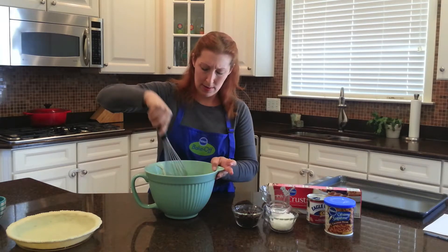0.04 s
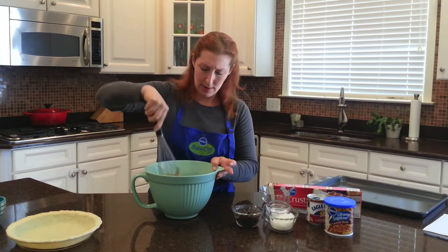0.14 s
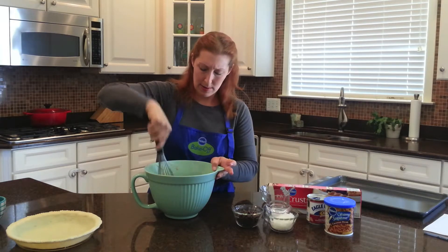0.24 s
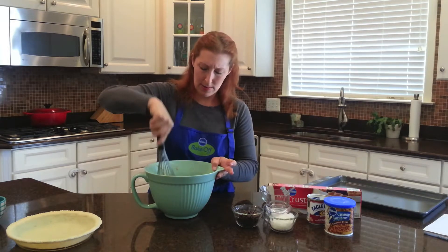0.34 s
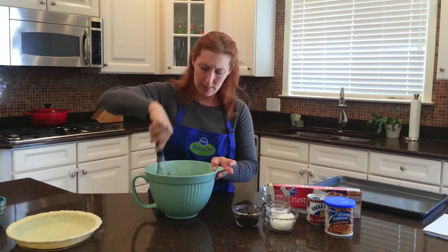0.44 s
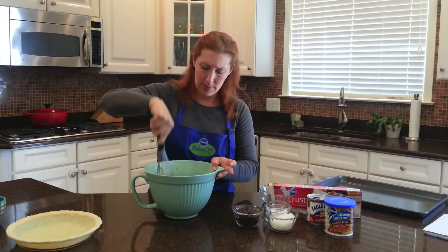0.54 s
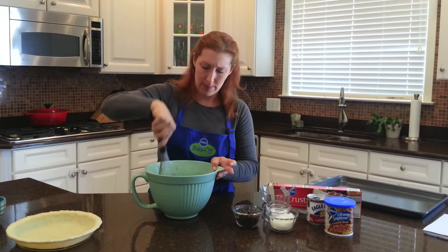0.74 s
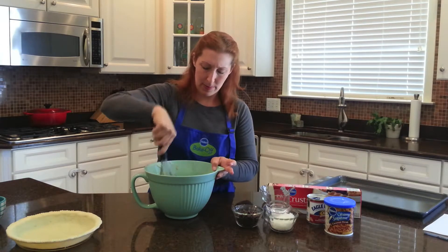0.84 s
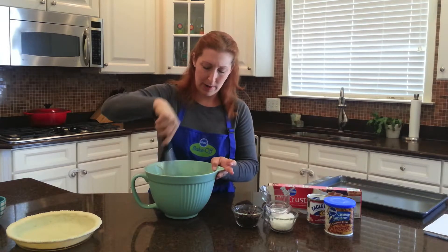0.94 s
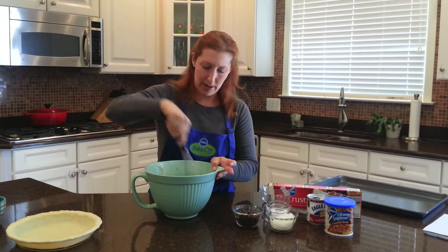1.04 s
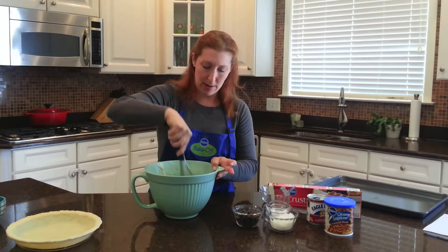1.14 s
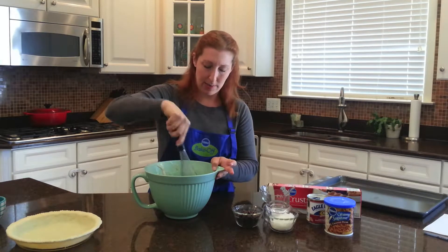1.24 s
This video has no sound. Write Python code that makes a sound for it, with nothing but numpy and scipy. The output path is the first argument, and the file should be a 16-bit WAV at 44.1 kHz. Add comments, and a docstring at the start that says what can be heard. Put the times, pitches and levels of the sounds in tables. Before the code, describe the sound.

A wire whisk strikes a ceramic bowl in a loud bright rattle, scrapes through thick filling, knocks the rim more dully, then rattles again; stereo microphone a couple of metres away in a hard, ringing kitchen.

```python
"""Quiet room tone and low hum, then a bright rattle: a whisk beats a thick filling in a ceramic bowl on stone.
The stereo microphone stands a couple of metres away in a hard kitchen, which rings after each rap.
Raps, rim knocks and foot bumps are short contacts exciting resonant modes; the dragging wires are random
slips over a diffuse hiss; drag treble, slop, counter rumble and room tone are coloured noise; the hum is a sine."""
import sys
import numpy as np
from scipy import signal
from scipy.fft import rfft, irfft, next_fast_len
from scipy.io import wavfile
from scipy.ndimage import map_coordinates

SR = 44100
rng = np.random.default_rng(int(sys.argv[2]) if len(sys.argv) > 2 else 0)


def digitize_waveform(pressure):
    """Quantize a signal to 16-bit integers and store it at the path in sys.argv[1].

    Rows of a 2-D input are taken as channels; values are limited to [-1, 1].
    """
    field = np.atleast_2d(pressure).T
    bounded = np.clip(field, -1, 1)
    quanta = np.round(bounded * 32767).astype(np.int16)
    wavfile.write(sys.argv[1], SR, quanta)


def voltage_ratio(decibels):
    """Convert decibels (scalar or array-like) to amplitude ratios, 20 dB per decade."""
    exponent = np.asarray(decibels, float) / 20
    return 10 ** exponent


N = 57330

# Quiet house noise. Each row: frequency in Hz, relative level in dB.
ROOM_TONE_COLOUR = [(59, -37), (100, -16.5), (183, -14.5), (221, -3.5), (283, -16.5), (518, -19.5),
                    (575, -30.5), (1050, -21), (1660, -26.5), (14500, -26.5)]
# Reverberation of the hard kitchen. Each row: frequency in Hz, time to fall 60 dB in seconds.
KITCHEN_T60 = [(200, 0.3), (700, 0.63), (2000, 0.4), (6000, 0.43), (13000, 0.24)]
# Left-right likeness of diffuse sound. Each row: frequency in Hz, likeness from 0 to 1.
ROOM_ALIKE = [(100, 0.7), (400, 0.7), (1000, .1), (5000, 0.02)]
# Shading of the microphone ports toward the bowl. Each row: frequency in Hz, left over right in dB.
PORT_LEAN = [(300, 0), (2000, 2.5), (5000, 8.5), (9000, -17), (14000, 2)]
# The counter shaking. Each row: time in seconds, level in dB before the layer's trim.
RUMBLE_LEVEL = [(0.0, -74), (0.158, -83), (0.246, -54.5), (0.604, -80.5), (0.648, -73), (0.854, -74),
                (0.882, -58), (0.93, -55.5), (1.012, -77), (1.07, -55), (1.122, -51), (1.146, -82),
                (1.198, -64.5), (1.3, -53)]
# Colour of the shaking counter. Each row: frequency in Hz, relative level in dB.
RUMBLE_COLOUR = [(15, -44), (35, -11), (58, -5), (100, -17), (150, -12), (300, -69.5)]
# The filling folding over. Each row: time in seconds, level in dB before trim and wobble.
SLOP_LEVEL = [(0.0, -72), (0.184, -73.5), (0.224, -53), (0.608, -70), (0.644, -63), (0.68, -69.5),
              (0.716, -58.5), (0.774, -68.5), (0.868, -64), (0.878, -62), (0.916, -50), (1.034, -67.5),
              (1.046, -50), (1.114, -43.5), (1.136, -44.5), (1.154, -42.5), (1.274, -59), (1.3, -54.5)]
# Colour of the folding filling. Each row: frequency in Hz, relative level in dB.
SLOP_COLOUR = [(71, -39.5), (120, -13.5), (161, -10.5), (217, 0.5), (333, -6.5), (436, 0), (571, -4),
               (900, -15.5), (1170, -34.5), (1980, -120)]
# Extra treble where the scrape turns brighter. Each row: time in seconds, level in dB before the wobble.
DRAG_TREBLE_LEVEL = [(.41, -89), (.44, -70), (.465, -55), (.49, -58), (.52, -79)]
# Colour of that extra treble. Each row: frequency in Hz, relative level in dB.
DRAG_TREBLE_COLOUR = [(4000, -41.5), (8000, -6), (11000, -1.5), (14000, -9), (16000, -32)]
# Wires scraping the wall through the filling. Each row: time in seconds, level in dB before the trims.
DRAG_LEVEL = [(.18, -74), (.198, -66.5), (.21, -47.5), (.3, -44.5), (.4, -58.5), (.44, -49), (.488, -58),
              (.526, -76), (.54, -62.5), (.602, -105), (.62, -66), (.635, -55.5), (.696, -76), (.73, -71),
              (.802, -93), (.808, -70.5), (.816, -51), (.858, -71.5), (.882, -55.5), (.93, -60.5),
              (1.03, -84), (1.048, -72.5), (1.06, -54.5), (1.1, -52), (1.27, -65), (1.3, -42.5)]
# Colour of the scraping wires. Each row: frequency in Hz, relative level in dB.
DRAG_COLOUR = [(410, -36), (700, -18.5), (1360, -9.5), (1950, -8), (3710, -9.5), (7130, 2.5), (9330, -8.5),
               (14100, -12), (15000, -36)]
# The bowl's foot bumping the counter. Each row: start in seconds, dry peak in dB, pitch in Hz.
FOOT_BUMPS = [(.706, -51, 265), (0.713, -58, 191), (0.734, -56, 256), (0.874, -53, 361), (1.045, -48, 318),
              (1.102, -49, 422), (1.114, -50, 201), (1.144, -48, 262), (1.15, -52, 457)]
# The one mode rung by a light touch. Each row: frequency in Hz, width in Hz, relative level in dB.
TING_MODE = [(2150, 24, 0)]
# The handle knocking the rim. Each row: start in seconds, dry peak in dB.
RIM_KNOCKS = [(0.8899, -24.5), (0.8943, -30.5), (0.914, -32.5)]
# Rim modes. Each row: frequency in Hz, width in Hz, relative level in dB before the row-by-row weights.
RIM_MODES = [(1105, 290, -2.5), (1940, 430, 2), (4110, 500, -0.5), (7500, 1100, -36)]
# Wires striking the bowl wall. Each row: start in seconds, dry peak in dB, spot from 0 (far wall) to
# 1 (near wall), brightness in dB per octave, left over right in dB on top of the port shading.
RAPS = [(0.2102, -34, 0, 6, 17), (.2140, -13, 0.11, -3.5, 4), (0.2217, -9, 0.12, 3, -10.5),
        (0.2233, -10.5, 0.1, 0.4, -1.5), (.2295, -19.5, 0.54, -0.1, -19), (.2375, -26, 0, -5, 11),
        (1.063, -14.5, 1, 0, -.5), (1.0700, -16, 0.8, 0.6, 2), (1.0790, -20, 0.43, -8, 0.5),
        (1.285, -49, 0.28, -2.5, 12), (1.2930, -28, .1, -8, -4.5), (1.2985, -27.5, 0.0034, 9.5, -9)]
# Bowl modes. Each row: frequency in Hz, width in Hz, relative level in dB when struck on the far wall,
# the same on the near wall; each rap's brightness then tilts them.
BOWL_MODES = [(360, 36, -27, -48.5), (540, 110, -35, -43.5), (766, 46, -29, -38), (1040, 110, -30.5, -23),
              (1926, 124, -22, -10.5), (2257, 84, -7.5, -12), (2890, 363, -14.5, -12.5),
              (3762, 111, -7.5, 1.5), (4137, 450, -24, -9.5), (4790, 280, -4.5, -12.5),
              (5436, 188, -4.5, -2), (6440, 220, 3, -24), (6975, 250, -2, -20.5), (7437, 210, -8.5, -0.5),
              (8357, 170, -14, -5), (9060, 310, -10.5, -17), (10360, 330, -35, -18),
              (13270, 200, -43.5, -27), (13700, 600, -22, -45)]
# Click under every ring. Each row: frequency in Hz, level in dB before each blow's own click level.
CLICK_COLOUR = [(150, -23.5), (500, -25), (1200, -10), (2000, -7), (8000, -2), (15000, -17.5)]


def unit(x):
    """Scales a signal to rms 1."""
    return x / np.sqrt(np.mean(x ** 2) + 1e-20)


def along(points, hz):
    """Reads (Hz, value) points on a log frequency axis."""
    f, value = np.transpose(points)
    return np.interp(np.log(hz + 1), np.log(f + 1), value)


def level(rows):
    """Gain per sample from (second, dB) rows, practically silent outside them."""
    s, db = np.transpose(rows)
    return voltage_ratio(np.interp(np.arange(N) / SR, s, db, left=-120, right=-120))


def wobble(rate):
    """A smooth random curve through normal knots, rate of them a second."""
    knots = rng.standard_normal(int(N * rate / SR) + 4)
    return map_coordinates(knots, [np.arange(N) * rate / SR])


def filtered(x, response):
    """Applies a complex frequency response, padded to leave room for its ringing."""
    size = next_fast_len(N + SR // 2)
    spectrum = rfft(x, size) * response(np.fft.rfftfreq(size, 1 / SR))
    return irfft(spectrum, size)[..., :N]


def spread(pair, gain=lambda hz: 1):
    """Mixes two unrelated signals into a left and right that are most alike in the bass."""
    def mid_side(hz):
        angle = np.arccos(np.clip(along(ROOM_ALIKE, hz), -1, 1)) / 2
        return gain(hz) * np.array([np.cos(angle), np.sin(angle)])
    mid, side = filtered(pair, mid_side)
    return np.array([mid + side, mid - side])


def noise(colour):
    """Diffuse coloured stereo noise of rms 1."""
    white = rng.standard_normal((2, N))
    return unit(spread(white, lambda hz: voltage_ratio(along(colour, hz))))


def kitchen(x, tail_db=-0.5):
    """A quick answer of counter and cupboards, and a long tail whose frequencies die at their own speeds."""
    near_db, near_t60_s = -5, 0.078
    room_db, gap_s = 3.5, 0.004  # gain of both answers; delay before they begin
    hz, t, grid = signal.stft(rng.standard_normal((2, SR)), SR, nperseg=256)
    decay = voltage_ratio(-60 * t / along(KITCHEN_T60, hz)[:, None])
    tail = signal.istft(grid * decay, SR, nperseg=256)[1][:, :SR]
    near = rng.standard_normal((2, SR)) * voltage_ratio(-60 * np.arange(SR) / SR / near_t60_s)
    answer = voltage_ratio(tail_db) * tail / np.linalg.norm(tail[0])
    answer = answer + voltage_ratio(near_db) * near / np.linalg.norm(near[0])
    answer = np.pad(answer, ((0, 0), (round(gap_s * SR), 0)))
    wet = signal.fftconvolve(x[None], answer, axes=1)[:, :N]
    return voltage_ratio(room_db) * spread(wet)


def ports(x):
    """Direct sound reaches two microphone ports with shading and a small lag on the left."""
    left_lag_s = 0.00005
    side = np.array([[0.5], [-0.5]])

    def response(hz):
        lag = np.exp(-2j * np.pi * hz * side * left_lag_s)
        return voltage_ratio(side * along(PORT_LEAN, hz)) * lag
    return filtered(x, response)


def blow(s, peak_db, modes, click_db, touch_s=0.002, soft=False, mode_weight=-1):
    """A hard chattering contact, or a soft push, rings resonant modes and adds a broadband click."""
    t = np.maximum(np.arange(N) / SR - s, 0)
    chatter = 0.15 * np.roll(rng.standard_normal(N), round(s * SR))  # against a first touch of 1
    hard = chatter + (np.arange(N) == int(s * SR) + 1)
    force = t / touch_s if soft else hard
    touch = (t > 0) * np.exp(-t / touch_s) * force

    def response(hz):
        total = voltage_ratio(click_db + along(CLICK_COLOUR, hz))
        for k, (centre, width, db) in enumerate(modes):
            resonance = 1j * hz * width / (centre ** 2 - hz ** 2 + 1j * hz * width)
            total = total + mode_weight ** k * voltage_ratio(db) * resonance  # -1 alternates the polarity
        return total
    x = filtered(touch, response)
    return voltage_ratio(peak_db) * x / np.abs(x).max()


def room_tone():
    """Quiet house noise, and a mains hum whose level wavers by a random curve."""
    hum_hz, hum_db = 59, -76.5
    hum_gain = voltage_ratio(hum_db + 1.5 * wobble(24))
    hum = hum_gain * np.sin(2 * np.pi * hum_hz * np.arange(N) / SR)
    return voltage_ratio(-70) * noise(ROOM_TONE_COLOUR) + hum


def rumble():
    """The stone counter shaking: low noise that swells and fades."""
    return level(RUMBLE_LEVEL) * voltage_ratio(-4.5) * noise(RUMBLE_COLOUR)


def slop():
    """The thick filling folds over with a low gurgle, made lumpy by a random gain."""
    lumps = voltage_ratio(-3.5 + 1.9 * wobble(45))
    return level(SLOP_LEVEL) * lumps * noise(SLOP_COLOUR)


def drag_treble():
    """Extra treble of the scraping wires, where the scrape turns brighter: high noise with a fast flutter."""
    flutter = voltage_ratio(2.5 * wobble(147.5))
    return level(DRAG_TREBLE_LEVEL) * flutter * noise(DRAG_TREBLE_COLOUR)


def drag():
    """Tiny uneven slips of wet wire on the wall, over a smooth diffuse hiss for their echoes."""
    slips_per_s, spread_db = 1800, 9.5  # spread to either side
    slips = (rng.random(N) < slips_per_s / SR) * rng.standard_normal(N)
    slips = slips * voltage_ratio(spread_db * rng.uniform(-1, 1, N))
    grains = unit(filtered(slips, lambda hz: voltage_ratio(along(DRAG_COLOUR, hz))))
    scrape = voltage_ratio(-1.5) * ports(grains) + voltage_ratio(0.5) * noise(DRAG_COLOUR)
    return level(DRAG_LEVEL) * scrape


def foot_bumps():
    """The bowl's foot pushes softly on the counter, each bump ringing one low narrow mode."""
    return sum(blow(s, db, [(hz, 30, 0)], click_db=-72, touch_s=0.0017, soft=True)
               for s, db, hz in FOOT_BUMPS)


def ting():
    """A light touch rings a single narrow mode."""
    return blow(0.9626, -52, TING_MODE, click_db=-33)


def rim_knocks():
    """The handle knocks the rim: duller blows on a few broad modes, each weighted below the last."""
    return sum(blow(s, db, RIM_MODES, click_db=-26, mode_weight=0.78) for s, db in RIM_KNOCKS)


def knocks():
    """Rim knocks, ting and foot bumps heard directly and through the kitchen, the light ones drier."""
    rim = rim_knocks()
    light = ting() + foot_bumps()
    return ports(rim + light) + voltage_ratio(2.0) * kitchen(rim, tail_db=-10.5) + voltage_ratio(-13) * kitchen(light)


def raps():
    """Wires strike the ceramic wall one after another; the spot struck sets which modes speak."""
    out = np.zeros((2, N))
    for s, db, spot, tilt_db, pan_db in RAPS:
        modes = []
        for hz, width, far_db, near_db in BOWL_MODES:
            struck_db = far_db + spot * (near_db - far_db)
            modes.append((hz, width, struck_db + tilt_db * np.log2(hz / 5000)))
        x = blow(s, db, modes, click_db=-21.5)
        pan = voltage_ratio([[pan_db / 2], [-pan_db / 2]])
        out += pan * ports(x) + kitchen(x)
    return out


def scene():
    """Sums the whisk on the bowl, the moving filling, the shaking counter and the room."""
    return raps() + knocks() + drag() + drag_treble() + slop() + rumble() + room_tone()


def band_limit(x):
    """A steep low-pass at the top of the band."""
    return signal.sosfilt(signal.butter(12, 15780, fs=SR, output="sos"), x)


def record(dry):
    """The microphone rolls off at the top of the treble."""
    top_hz, slope = 14500, 13
    mix = filtered(dry, lambda hz: 1 / np.sqrt(1 + (hz / top_hz) ** slope))
    return band_limit(mix)


dry = scene()
out = record(dry)
digitize_waveform(out)
```